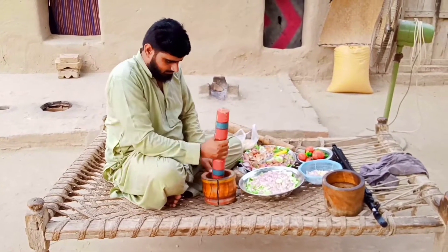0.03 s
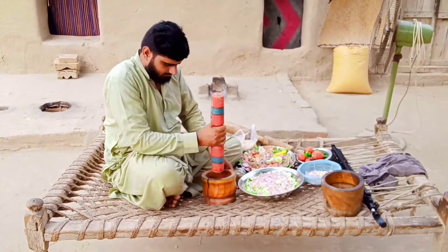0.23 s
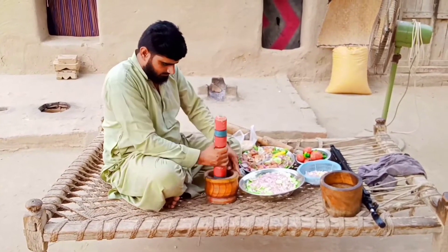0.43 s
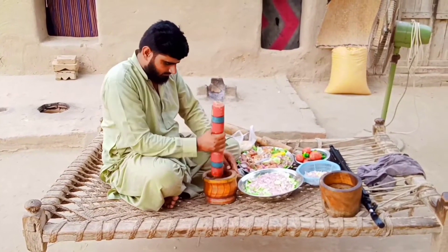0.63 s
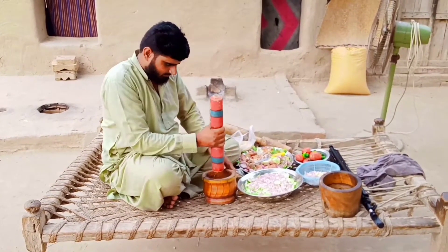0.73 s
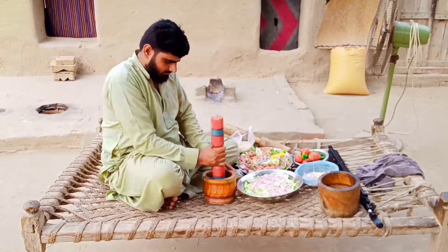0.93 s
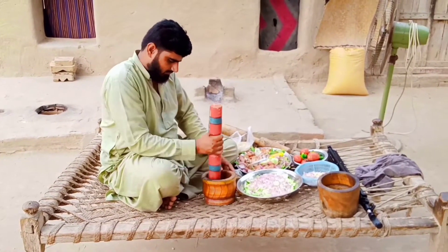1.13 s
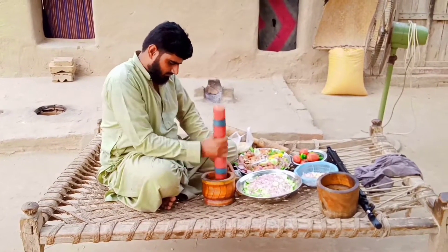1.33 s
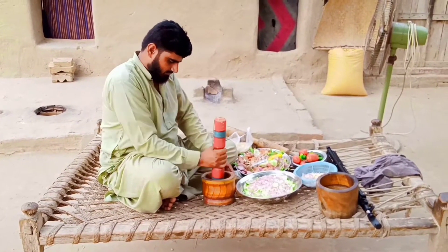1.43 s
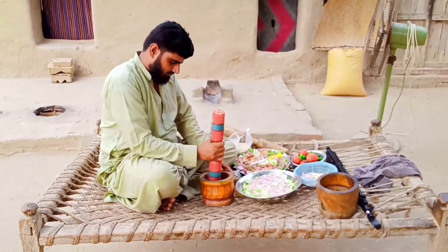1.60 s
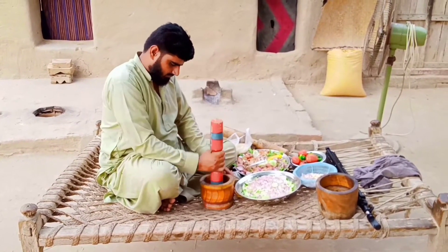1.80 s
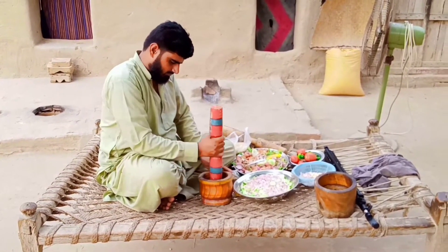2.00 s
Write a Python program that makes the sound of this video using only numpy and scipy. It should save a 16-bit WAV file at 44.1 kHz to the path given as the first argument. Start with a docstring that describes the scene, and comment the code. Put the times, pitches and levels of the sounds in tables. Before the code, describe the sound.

Short, hollow knocks come steadily as a wooden pestle pounds spices in a mortar in an open courtyard. The fourth is loudest, followed by a faint gritty scrape, a last knock and a dry tick, over a low hum.

```python
"""Short, hollow knocks, about two a second: a wooden pestle pounds spices in a wooden mortar on a rope cot.
Each blow lands with a double contact that rings the wood and the air in the bowl. The mud walls of the
courtyard answer, the cot rustles, and the spices crunch and scrape faintly between blows.
A sharp tick comes near the end. Behind it all: a low hum, soft air, steady hiss and two faint chirps."""
import sys
import numpy as np
from scipy import signal
from scipy.fft import rfft, irfft, next_fast_len
from scipy.io import wavfile
from scipy.ndimage import uniform_filter1d, map_coordinates

SR = 44100
rng = np.random.default_rng(int(sys.argv[2]) if len(sys.argv) > 2 else 0)


def unload_wav(signal):
    """Save mono or channel-first audio to the path in sys.argv[1] as 16-bit WAV at rate SR, clipped to [-1, 1]."""
    wavfile.write(
        sys.argv[1],
        SR,
        np.round(np.clip(np.atleast_2d(signal).T, -1, 1) * 32767).astype(np.int16),
    )


N = 90581

# The pestle's blows. Each row: start in seconds, gain in dB, pitch ratio of the wood, cushioning corner
# in Hz, hollow pitch in Hz, hollow, thud and clack gains in dB, second contact's delay in seconds and
# gain in dB, crushed spice and courtyard send in dB relative to the blow.
BLOWS = [(-.034, -6.5, 1, 3550, 827, 0, 8, -5, 0.0032, -12.5, -35, -1),
         (0.4687, -5.5, .975, 4560, 763, 3, 1, -3, 0.0024, -10.5, -19, 0),
         (0.9541, -5.5, .99, 5550, 793, 4, 7.5, -7, .0019, -6.5, -15.5, 3),
         (1.4565, 3.1, 1.019, 2420, 961.5, -1.5, -3.5, -2.7, 0.002186, -4.5, -25.5, 3),
         (1.8810, -4.5, 1.018, 3300, 818, -0.1, -5.5, 4.5, 0.0023, -10.5, -19.5, 1)]


def amp(db):
    """Decibels to gain."""
    return 10 ** (np.asarray(db) / 20)


def unit(x):
    """Scale to rms 1."""
    return x / np.sqrt(np.mean(x ** 2) + 1e-20)


def along(points, hz):
    """Read a curve of (Hz, value) points on a log frequency axis."""
    freqs, values = np.transpose(points)
    return np.interp(np.log(hz + 1), np.log(freqs + 1), values)


def filtered(x, response):
    """Filter x by a complex function of frequency."""
    n = x.shape[-1]
    padded = next_fast_len(n + SR // 4)
    return irfft(rfft(x, padded) * response(np.fft.rfftfreq(padded, 1 / SR)), padded)[..., :n]


def coloured(x, spectrum):
    """Equalise x by (Hz, dB) points and scale it to rms 1."""
    return unit(filtered(x, lambda hz: amp(along(spectrum, hz))))


def delay(hz, seconds):
    """Frequency response of a pure delay."""
    return np.exp(-2j * np.pi * hz * seconds)


def wobble(rate):
    """A smooth random curve with `rate` knots a second."""
    knots = rng.standard_normal(int(N * rate / SR) + 4)
    return map_coordinates(knots, [np.arange(N) * rate / SR])


def add(track, start, sound):
    """Mix a sound into the track at `start` seconds."""
    i = int(round(start * SR))
    part = sound[max(-i, 0):max(N - i, 0)]
    track[max(i, 0):max(i, 0) + len(part)] += part


def burst(spectrum, t, t60):
    """Coloured noise that starts at once and falls 60 dB in t60 seconds."""
    return coloured(rng.standard_normal(len(t)), spectrum) * amp(-60 * t / t60)


def patchy_noise(depth_db):
    """Noise whose level drifts in small patches of time and frequency."""
    bins = signal.stft(rng.standard_normal(N), nperseg=1024)[2]
    patches = uniform_filter1d(rng.standard_normal(bins.shape), size=4, axis=0)
    patches = uniform_filter1d(patches, size=8, axis=1)
    return signal.istft(bins * amp(depth_db * unit(patches)), nperseg=1024)[1][:N]


def air():
    """A soft bed of noise, fullest in the bass."""
    # The bed's tone. Each row: frequency in Hz, relative level in dB.
    air_eq = [(25, -16), (42, -15), (90, 4), (125, -1.5), (180, 1), (300, -3.5), (550, -7.5), (1000, -7),
              (1600, -7), (2500, -10), (3700, -9), (4700, -22), (9000, -24)]
    return amp(-48) * coloured(patchy_noise(depth_db=2.1), air_eq)


def hiss():
    """Mid and side of a gently drifting hiss that widens towards the top."""
    # The hiss's tone and the side's extra shaping. Each row: frequency in Hz, gain in dB.
    hiss_eq = [(2000, -11), (4000, -5.5), (5200, -8.5), (6300, 1.5), (7100, 3), (8000, -2), (9500, -9.5),
               (12500, -16), (14300, -13), (15000, -29), (15800, -27)]
    side_eq = [(2800, -66), (4000, -22), (5500, -9.5), (7000, -55), (9500, -5), (14000, -0.5)]
    # A fader ride, used as a swing about its median. Each row: time in seconds, level in dB.
    fader_ride = [(0.0, -58), (0.02, -60), (0.99, -59), (1.0, -60.5), (1.05, -59.5), (1.42, -59.5),
                  (1.44, -63.5), (1.75, -57.5), (1.78, -56), (1.93, -66), (1.98, -59), (2.0, -57)]
    times, ride_db = np.transpose(fader_ride)
    swing_db = 0.97 * np.interp(np.arange(N) / SR, times, ride_db - np.median(ride_db))
    mid, side = (amp(-52 + swing_db) * coloured(patchy_noise(depth_db=2.2), hiss_eq) for _ in range(2))
    return mid, filtered(side, lambda hz: amp(along(side_eq, hz)))


def hum():
    """Low, slightly wavering tones, as of a distant motor."""
    # The hum's partials. Each row: frequency in Hz, rms level in dB.
    hum_partials = [(50, -72), (70, -62.5), (100, -54), (151, -57), (201, -69), (301, -65.5), (363, -64.5)]
    waver_hz, waver_db = 1.3, 2.5
    out = np.zeros(N)
    for hz, db in hum_partials:
        cycles = np.cumsum(hz + waver_hz * wobble(4.86)) / SR + rng.random()
        out += np.sqrt(2) * amp(db - waver_db * wobble(7.2)) * np.sin(2 * np.pi * cycles)
    return out


def chirps():
    """Faint falling chirps, perhaps a far bird."""
    # Each row: start and length in seconds, first and last pitch in Hz, level in dB.
    chirp_calls = [(0.526, .016, 7760, 6700, -48), (1.96, 0.0406, 6950, 6350, -45)]
    waver_hz, octave_db = 114, -13
    out = np.zeros(N)
    for start, length, from_hz, to_hz, db in chirp_calls:
        n = int(length * SR)
        pitch = np.linspace(from_hz, to_hz, n) + waver_hz * wobble(500)[:n]
        phase = 2 * np.pi * np.cumsum(pitch) / SR
        tone = np.sin(phase) + amp(octave_db) * np.sin(2 * phase)
        add(out, start, amp(db) * np.hanning(n) ** .5 * tone)
    return out


def ticks():
    """A cluster of dry, bright ticks, close enough to be heard as one."""
    # Each row: start in seconds, level in dB.
    tick_hits = [(2.0179, -30), (2.0186, -26), (2.0258, -35.5)]
    # A tick's tone. Each row: frequency in Hz, relative level in dB.
    tick_eq = [(100, -55), (600, -39), (1700, -12), (2900, 2.5), (4200, -3), (5200, -15), (7500, -2.5),
               (11000, -24), (15000, -13)]
    out, t = np.zeros(N), np.arange(SR // 10) / SR
    for start, db in tick_hits:
        add(out, start, amp(db) * burst(tick_eq, t, t60=0.013))
    return out


def cot():
    """The rope cot shudders with a dull rustle after each blow."""
    # The rope's tone. Each row: frequency in Hz, relative level in dB.
    rope_eq = [(60, -30), (150, -7.5), (280, 2), (450, -3), (600, -2), (750, 2), (1150, -3), (1550, -1.5),
               (2400, -14.5), (4000, -35), (10000, -45)]
    out, t = np.zeros(N), np.arange(SR // 2) / SR
    attack = 1 - np.exp(-t / 0.021)
    for start, *_ in BLOWS:
        add(out, start, amp(-39) * burst(rope_eq, t, t60=0.59) * attack)
    return out


def spice_grains(swells, spectrum, grains_per_s=2500):
    """Dense, tiny clicks of spice in bell-shaped swells."""
    t = np.arange(N) / SR
    grains = rng.standard_normal(N) * (rng.random(N) < grains_per_s / SR)
    envelope = sum(amp(db) * np.exp(-((t - middle) / half) ** 2) for middle, half, db in swells)
    return coloured(grains, spectrum) * envelope


def crunches():
    """Spices shift under the pestle in brief crunches."""
    # Each row: middle and half length in seconds, level in dB.
    crunch_swells = [(.400, 0.0042, -43.5), (0.516, 0.0046, -40.5), (1.001, 0.0086, -37),
                     (1.012, 0.0034, -50), (1.333, 0.017, -49.5), (1.478, 0.0016, -40),
                     (1.501, 0.0068, -40.5), (1.901, 0.0035, -38)]
    # A crunch's tone. Each row: frequency in Hz, relative level in dB.
    crunch_eq = [(60, -33), (200, -6), (700, -2), (1700, 4.5), (3200, -1.5), (4800, -16.5), (7000, -6),
                 (10000, -23), (15000, -30)]
    return spice_grains(crunch_swells, crunch_eq)


def scrapes():
    """The pestle rubs grittily along the bowl before the last blow."""
    # Each row: middle and half length in seconds, level in dB.
    scrape_swells = [(1.785, 0.054, -46.5), (1.84, 0.015, -45)]
    # A scrape's tone. Each row: frequency in Hz, relative level in dB.
    scrape_eq = [(60, -21), (200, -17), (450, 11), (800, -12), (1400, 8), (2300, -7.5), (3500, 3),
                 (4700, -20), (7000, -3), (10000, -20), (15000, -29)]
    return spice_grains(scrape_swells, scrape_eq)


def courtyard(x):
    """The mud walls return weak echoes, one clearer dull slap from the far wall and a short tail."""
    # The weak echoes. Each row: delay in seconds, gain in dB.
    wall_taps = [(.0105, -29), (.0185, -25), (.031, -33), (.116, -32)]
    # The diffuse tail's decay. Each row: frequency in Hz, seconds to fall 60 dB.
    tail_t60 = [(150, 0.48), (800, 0.56), (2000, 0.44), (8000, 0.11)]
    # The tone of the tail and of the slap. Each row: frequency in Hz, relative gain in dB.
    tail_eq = [(150, -17.5), (330, 1), (520, -3.5), (700, 1.5), (830, -3), (1020, 2.5), (1250, -4),
               (1550, 5), (1850, 0.5), (3000, -3.5), (8000, -16)]
    slap_eq = [(200, -15), (500, -2), (730, -0.5), (950, -15), (1500, -18), (3000, -20)]
    tail_db, build_s, slap_db, slap_s, dull_hz = -21, 0.0072, -16, 0.0725, 2160
    hz, t, bins = signal.stft(rng.standard_normal(len(x)), SR, nperseg=256)
    envelope = amp(-60 * t / along(tail_t60, hz)[:, None]) * (1 - np.exp(-t / build_s))
    tail = signal.istft(bins * envelope, SR, nperseg=256)[1]
    tail = filtered(tail / np.linalg.norm(tail), lambda f: amp(tail_db + along(tail_eq, f)))
    echoes = filtered(
        x, lambda f: sum(amp(db) * delay(f, lag) for lag, db in wall_taps) / (1 + 1j * f / dull_hz))
    slap = filtered(x, lambda f: amp(slap_db + along(slap_eq, f)) * delay(f, slap_s))
    return echoes + slap + signal.fftconvolve(x, tail)[:len(x)]


def press(hz=553, width_s=0.00054):
    """A soft, dull push as the spices give way; returns the pulse and its middle in seconds."""
    t = np.arange(SR // 100) / SR
    offset = t - t.mean()
    return -amp(-15.5) * np.exp(-(offset / width_s) ** 2) * np.sin(2 * np.pi * hz * offset), t.mean()


def knock(t, pitch, cushion_hz, hollow_hz, hollow_db, thud_db, clack_db, again_s, again_db):
    """Two quick contacts, cushioned by the spices, ring the bowl's air and the wood."""
    # The modes of the mortar with the pestle in it.
    # Each row: frequency in Hz, relative level in dB, seconds to fall 60 dB, polarity.
    wood_modes = [(200.7, -14, 0.023, 1), (314, -23, 0.031, -1), (514, -19, 0.019, -1),
                  (648.7, -17, 0.07, 1), (934, -3.5, 0.027, 1), (1103, -10.5, 0.049, -1),
                  (1621, -10, 0.034, 1), (1877, -18.5, 0.03, -1), (2305, -10.5, 0.019, -1),
                  (3040, -23, 0.035, -1), (3700, -31, 0.032, 1)]
    hollow_t60, thud_below_hz, clack_above_hz, low_cut_hz = 0.026, 550, 1050, 143
    # Where the pestle lands sets the air's hollow pitch and the weight of low and high modes.
    ring = -amp(hollow_db - 60 * t / hollow_t60) * np.sin(2 * np.pi * hollow_hz * t)
    for hz, db, t60, polarity in wood_modes:
        spot_db = thud_db * (hz < thud_below_hz) + clack_db * (hz > clack_above_hz)
        ring += polarity * amp(db + spot_db - 60 * t / t60) * np.sin(2 * np.pi * hz * pitch * t)
    struck = filtered(
        ring, lambda f: (1 + amp(again_db) * delay(f, again_s)) / (1 + 1j * f / cushion_hz) ** 4)
    return signal.sosfilt(signal.butter(2, low_cut_hz, "high", fs=SR, output="sos"), struck)


def pounding():
    """Every blow presses and crushes some spice, knocks the mortar and stirs the courtyard."""
    # The tone of spice being crushed. Each row: frequency in Hz, relative level in dB.
    crush_eq = [(100, -43), (400, -15), (1200, 7.5), (2500, 1), (2800, -12.5), (3150, -8.5), (3600, -20.5),
                (4000, -6), (4600, -23), (8000, -25), (15000, -41)]
    out, t = np.zeros(N), np.arange(SR // 2) / SR
    push, middle_s = press()
    lead_s = 0.0013  # the spices give way just before wood meets wood
    attack = 1 - np.exp(-t / 0.00067)
    for start, db, *contact, crush_db, yard_db in BLOWS:
        crush = amp(crush_db) * burst(crush_eq, t, t60=0.039) * attack
        blow = amp(db) * (knock(t, *contact) + crush)
        add(out, start - lead_s - middle_s, amp(db) * push)
        add(out, start, blow + amp(yard_db) * courtyard(blow))
    return out


def scene():
    """Everything sits in the centre; only the top of the hiss has width."""
    bed = air()
    hiss_mid, side = hiss()
    mid = bed + hiss_mid + hum() + pounding() + cot() + crunches() + scrapes() + ticks() + chirps()
    return np.array([mid + side, mid - side])


def record(dry):
    """A brick-wall low-pass takes off the very top."""
    return filtered(dry, lambda hz: hz < 15700)


dry = scene()
out = record(dry)
unload_wav(out)
```